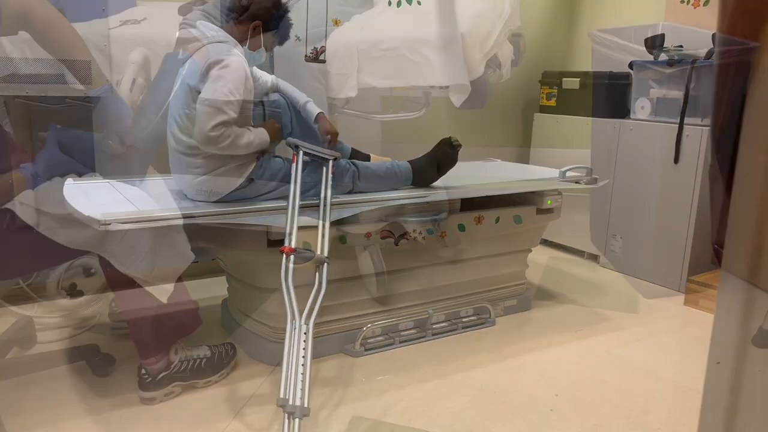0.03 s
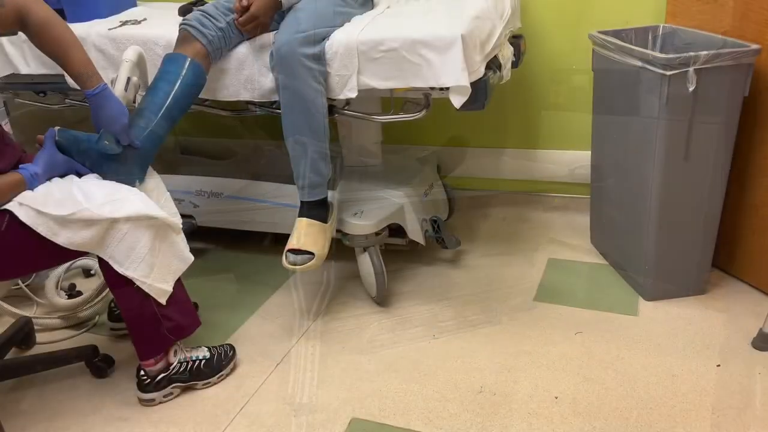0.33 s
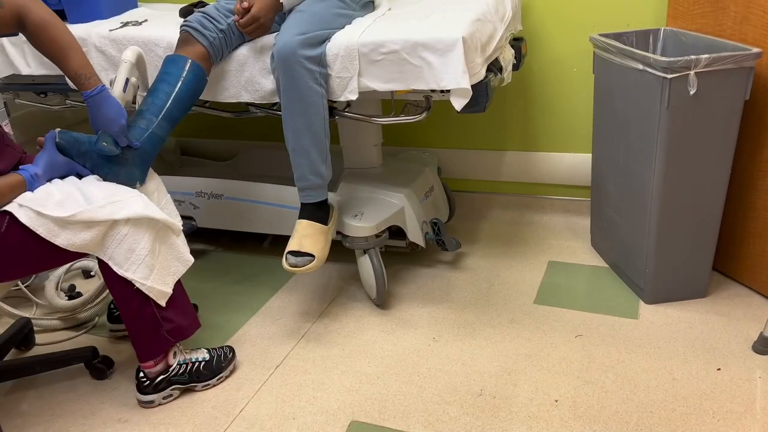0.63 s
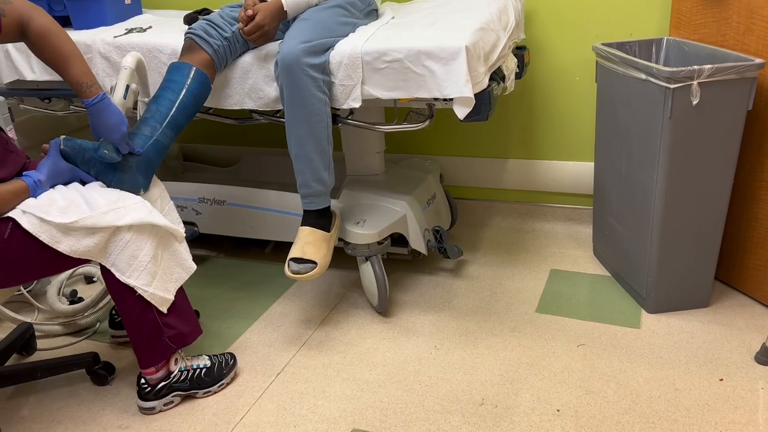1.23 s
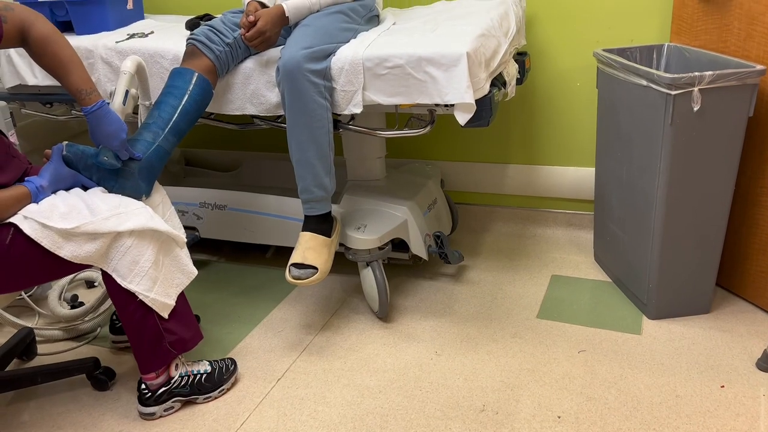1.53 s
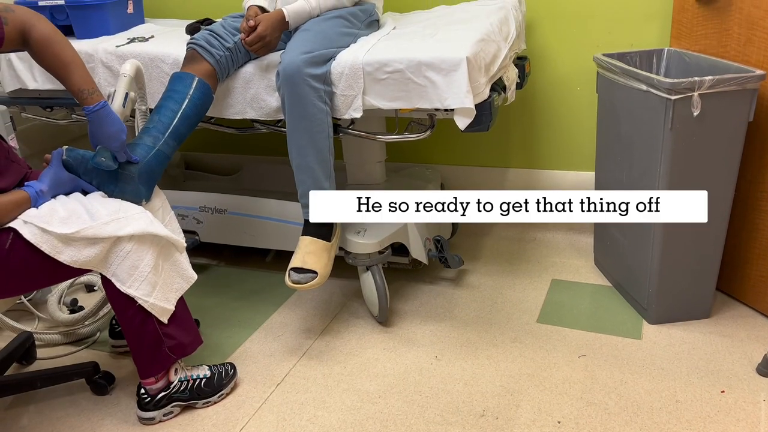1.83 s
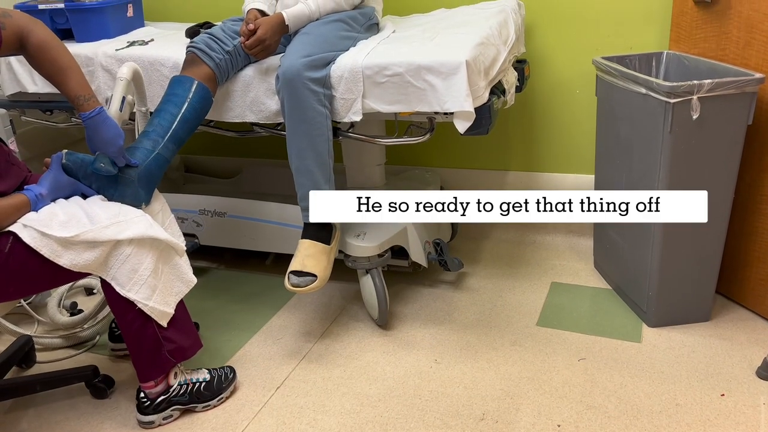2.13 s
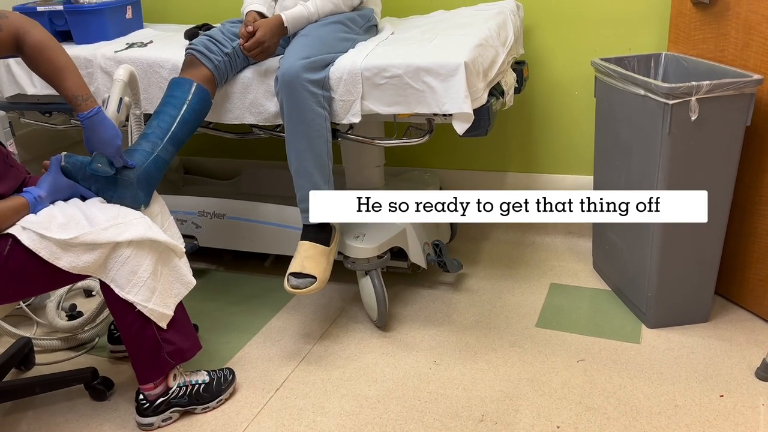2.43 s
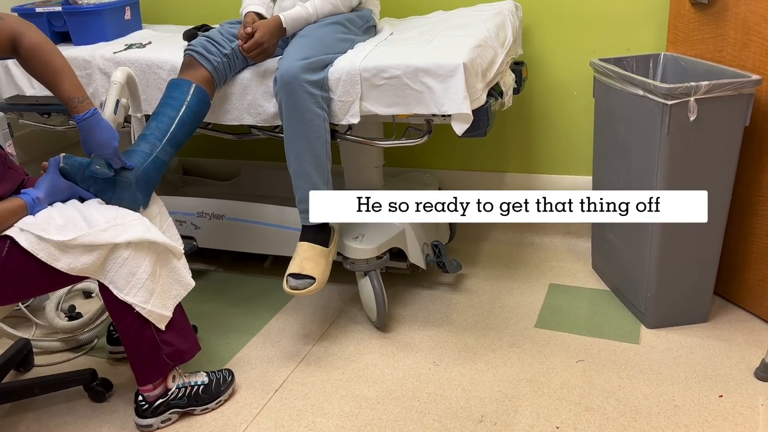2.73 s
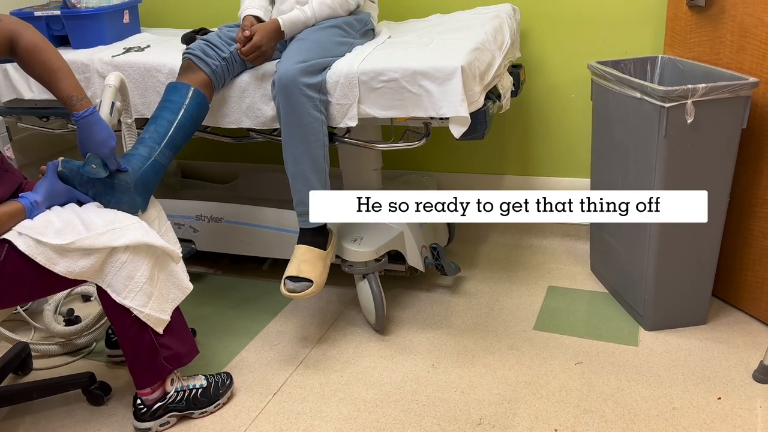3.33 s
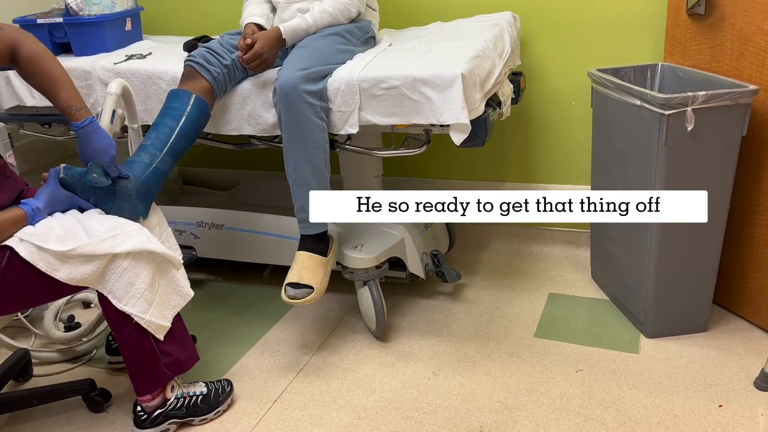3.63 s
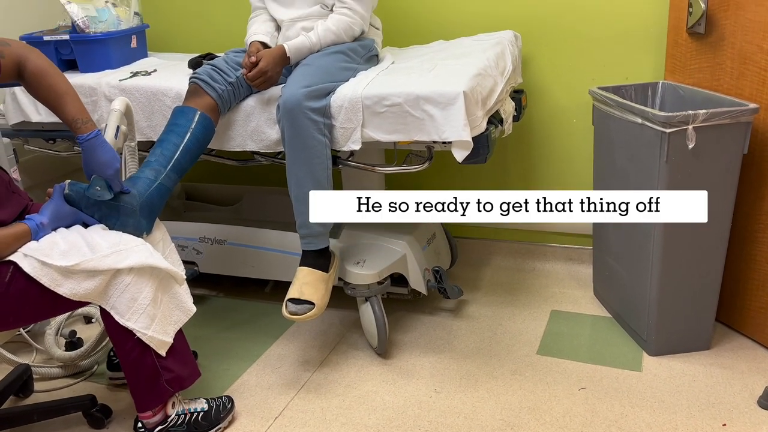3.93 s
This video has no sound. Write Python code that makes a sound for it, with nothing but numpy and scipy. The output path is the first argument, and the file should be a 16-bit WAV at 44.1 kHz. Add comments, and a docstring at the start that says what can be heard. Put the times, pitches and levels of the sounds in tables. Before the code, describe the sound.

A cast saw cuts into fibreglass with a continuous buzzing whine in a small room.

```python
"""A small, hard clinic room: a few steps away, an oscillating cast saw cuts a fibreglass leg cast.
The blade buzzes at its stroke rate; its teeth scrape and sizzle as it is pressed in.
Now and then they bite harder, or skate grittily over the glass fibres.
The dust extractor hums, whistles and hisses beside it. At first a low tone beats against both and fades."""
import sys
import numpy as np
from scipy import signal
from scipy.fft import rfft, irfft, next_fast_len
from scipy.io import wavfile
from scipy.ndimage import map_coordinates

SR = 44100
rng = np.random.default_rng(int(sys.argv[2]) if len(sys.argv) > 2 else 0)


def dump_mix(stems):
    """Bounce the given channels to the path in sys.argv[1] as a 16-bit WAV at rate SR."""
    frames = np.atleast_2d(stems).T  # one column per channel
    limited = np.clip(frames, -1, 1)  # hard clip at full scale
    pcm = np.round(limited * 32767).astype(np.int16)
    wavfile.write(sys.argv[1], SR, pcm)


N = 176400
TIME_S = np.arange(N) / SR


def amp(db):
    """dB to gain."""
    return 10 ** (np.asarray(db) / 20)


def unit(x):
    """Scale to rms 1."""
    return x / np.sqrt(np.mean(x ** 2) + 1e-20)


def along(points, hz):
    """Interpolate (f/Hz, value) on a log axis."""
    f, v = np.transpose(points)
    return np.interp(np.log(hz + 1), np.log(f + 1), v)


def curve(rows):
    """Interpolate (t/s, value) per sample."""
    return np.interp(TIME_S, *np.transpose(rows))


def swing(rows):
    """Curve minus its mean."""
    return curve(rows) - curve(rows).mean()


def wobble(rate_hz):
    """Smooth random curve, rate_hz knots a second."""
    return map_coordinates(rng.standard_normal(4096), [TIME_S * rate_hz + 2], mode="wrap")


def contacts(rows, edge_s):
    """Gain of (centre t/s, length/s, level/dB) contacts that catch, hold and let go."""
    return sum(amp(db) * .5 * (1 + np.tanh((length_s / 2 - abs(TIME_S - centre_s)) / edge_s))
               for centre_s, length_s, db in rows)


def filtered(x, response):
    """Apply the gain response(hz)."""
    size = next_fast_len(N + SR // 2)
    return irfft(rfft(x, size) * response(np.fft.rfftfreq(size, 1 / SR)), size)[..., :N]


def tone(phase, lag_rad):
    """Stereo sine, rms 1, right side lagging."""
    sides_rad = np.array([[lag_rad], [-lag_rad]]) / 2
    return np.sqrt(2) * np.sin(phase + rng.uniform(0, 2 * np.pi) + sides_rad)


# f/Hz, left-right correlation (clipped to +-1)
NOISE_CORRELATION = [(60, 0.94), (290, 0.89), (640, -0.32), (1400, -0.12), (3000, -0.24), (8000, 0.31),
                     (14000, -2.49)]


def stereo_noise(spectrum):
    """Shaped noise, rms 1: sides alike in the bass, diffuse above, opposed at the very top."""
    def mid_side_gains(hz):
        angle = np.arccos(np.clip(along(NOISE_CORRELATION, hz), -1, 1)) / 2
        return amp(along(spectrum, hz)) * [np.cos(angle), np.sin(angle)]
    mid, side = filtered(rng.standard_normal((2, N)), mid_side_gains)
    return unit(np.array([mid + side, mid - side]))


# Room decay: f/Hz, T60/s
ROOM_T60 = [(200, 0.49), (2000, 1), (10000, 0.06)]


def room(x):
    """Diffuse reflections off the hard walls, one tail per side."""
    hz, t, noise = signal.stft(rng.standard_normal((2, SR // 2)), SR, nperseg=256)
    decay = amp(-60 * t / along(ROOM_T60, hz)[:, None])
    tail = signal.istft(noise * decay, SR, nperseg=256)[1]
    return signal.fftconvolve(x, tail / np.linalg.norm(tail[0]), axes=1)[:, :N]


# Stroke rate: t/s, f/Hz
STROKE_HZ = [(0.06, 242.0), (0.14, 244.2), (0.26, 239.6), (0.4, 242.1), (0.52, 236.7), (0.6, 236.4),
             (0.7, 240.6), (0.88, 238.8), (0.98, 241.3), (1.3, 243.4), (1.46, 246.4), (1.76, 247.3),
             (2.02, 255.9), (2.1, 252.1), (2.18, 244.8), (2.3, 248.4), (2.48, 249.9), (2.64, 247.5),
             (2.74, 242.3), (2.94, 249.6), (3.3, 245.2), (3.4, 247.2), (3.68, 242.5), (3.93, 250.2)]
# How hard the blade rubs the cast: t/s, level/dB
RASP_DB = [(0.0, 2.5), (0.2, 2.5), (0.32, 2), (0.4, 3), (0.56, 1.8), (0.74, 3), (0.94, 0.5), (1.02, 1.5),
           (1.08, -0.5), (1.16, 1.5), (1.26, 1), (1.56, 2), (1.62, 2.5), (1.74, -1), (1.94, -5), (2.1, 4),
           (2.28, -1), (2.8, 3.5), (2.85, -5), (3.2, 1.5), (3.32, -1), (3.46, 1.5), (3.63, 2), (3.7, 3.5),
           (3.79, -10.5), (3.99, 2)]


def blade_motion():
    """The blade oscillates against the cast: stroke rate, stroke phase, rasp about its mean."""
    stroke_hz = curve(STROKE_HZ)
    return stroke_hz, 2 * np.pi * np.cumsum(stroke_hz) / SR, swing(RASP_DB)


# Harmonics 1-8: level/dB, rasp slope/(dB/dB), stroke-rate slope/(dB/Hz), right lag/rad
LOW_HARMONICS = [(-39.5, 0.5, -.5, 0.87), (-46, 1, 0.4, -1.84), (-37.5, 0.52, 0.36, -1.7),
                 (-42.5, 3.9, 0.17, 2.0), (-37, 0, -0.38, 1), (-37, 1, 0.1, -2), (-39.5, 0.9, 0.06, -4),
                 (-39, -0.5, 0, 1.5)]
# Swells of harmonics 5, 6, 8: t/s, level/dB
SWELL_5_DB = [(0.0, -6), (0.21, 7.5), (0.28, -5), (0.36, 3), (0.44, 6.5), (0.5, -9), (0.72, 2.5),
              (0.82, -20), (0.96, -3), (0.99, 3.5), (1.24, -1.5), (1.29, 0), (1.33, 3), (1.41, -5),
              (1.6, -3.5), (1.65, 12.5), (1.71, 0), (1.88, 0), (2.1, 4), (2.27, -10), (2.35, -2), (2.52, 2),
              (2.59, -6), (2.68, 12.5), (2.73, -3), (2.77, 14.5), (2.805, 9), (2.835, -18), (2.87, -0.5),
              (3.11, -2.5), (3.19, 6.5), (3.32, -3), (3.42, 7.5), (3.56, 3), (3.62, -7), (3.69, 13),
              (3.745, -4), (3.8, 3.5), (3.99, -9)]
SWELL_6_DB = [(0.06, 6), (0.13, -6), (0.4, 0.5), (0.62, 1.5), (0.85, 4.5), (1.08, -5), (1.9, -1),
              (1.98, -1), (2.22, -10), (2.36, 9), (2.7, 0), (3.99, 0)]
SWELL_8_DB = [(0.0, -35), (0.2, 6), (0.29, -5), (0.47, 10.5), (0.58, -3), (0.72, 7), (0.88, -6),
              (1.02, 7.5), (1.14, 0), (1.22, 4), (1.33, 4), (1.45, -0.5), (1.64, 6.5), (1.68, -0.5),
              (1.9, -1), (2.08, 8.5), (2.19, -8), (2.33, 6.5), (2.55, 13), (2.62, -2), (2.69, 9),
              (2.74, -9), (2.775, 19.5), (2.82, -15), (3.01, 12), (3.12, -2), (3.22, 9.5), (3.3, -7.5),
              (3.42, 8.5), (3.6, 8.5), (3.64, -21), (3.71, 9), (3.75, -12), (3.86, 0), (3.99, 5)]
# Envelope of harmonics 9-23: f/Hz, level/dB
UPPER_SPECTRUM = [(2200, -43), (2450, -47), (2720, -39.5), (3000, -46), (3200, -45.5), (3450, -46.5),
                  (3900, -49.5), (4450, -45.5), (5000, -51)]


def blade_buzz(stroke_hz, stroke_rad, rasp_db, bite_gain):
    """Stroke harmonics: the lowest stay clean, higher ones chatter and break up in the bites."""
    jitter_rad, low_drift_db, upper_drift_db, drift_hz = .035, 2, 3, 14
    chatter_db, chatter_rad, chatter_hz = 2.8, .4, 55
    bite_ring_db, room_db = 4, -14
    phase = stroke_rad + jitter_rad * amp(rasp_db / 2) * wobble(rate_hz=90)
    offset_hz = stroke_hz - stroke_hz.mean()
    swells_db = {5: swing(SWELL_5_DB), 6: swing(SWELL_6_DB), 8: swing(SWELL_8_DB)}
    bite_depth = (bite_gain / bite_gain.max()) ** 2
    slip_rad = chatter_rad * (1 + 0.66 * bite_depth)

    def harmonic(k, db, lag_rad, chatter):
        gain = amp(db + chatter * chatter_db * wobble(chatter_hz))
        return gain * tone(k * phase + chatter * slip_rad * wobble(chatter_hz), lag_rad)

    partials = []
    for k, (base_db, per_rasp_db, per_hz, lag_rad) in enumerate(LOW_HARMONICS, 1):
        drift_db = swells_db[k] if k in swells_db else low_drift_db * wobble(drift_hz)
        db = base_db + per_rasp_db * rasp_db + per_hz * offset_hz + drift_db
        partials.append(harmonic(k, db, lag_rad, chatter=(k - 1) / 10))
    for k in range(9, 24):
        drift_db = 0.36 * swells_db[8] + upper_drift_db * wobble(drift_hz)
        db = along(UPPER_SPECTRUM, k * stroke_hz.mean()) + drift_db + bite_ring_db * bite_depth
        partials.append(harmonic(k, db, rng.uniform(-np.pi, np.pi), chatter=1))
    return sum(partials) + amp(room_db) * room(sum(partials[1:]))


def tooth_pulse(stroke_rad, depth=0.33):
    """Gain, rms 1: the teeth rub in both directions of each stroke."""
    return unit(1 + depth * (np.cos(stroke_rad) + .5 * np.cos(2 * stroke_rad)))


# Teeth on the cast: f/Hz, density/dB
SCRAPE_SPECTRUM = [(200, -36), (380, -3), (600, -32), (800, 0), (1000, 0.5), (1750, -5.5), (2800, 2),
                   (4500, -10.5), (7000, -7.5), (15000, -20.5)]


def tooth_scrape(stroke_rad, rasp_db, bite_gain):
    """Friction noise, pulsed by the stroke, loudest in the bites."""
    gain = np.hypot(amp(-32.5 + rasp_db), bite_gain)
    return gain * tooth_pulse(stroke_rad) * stereo_noise(SCRAPE_SPECTRUM)


# Treble of the cut: f/Hz, density/dB
SIZZLE_SPECTRUM = [(4000, -33), (8000, -10), (10500, -6), (12800, 0), (15500, 0)]


def tooth_sizzle(rasp_db, bite_gain, flutter_db=1.1, width=.42):
    """Fluttering hiss of the teeth, near centre, rising in the bites."""
    gain = np.hypot(amp(-38 + .17 * rasp_db), amp(-11) * bite_gain)
    mid, side = filtered(rng.standard_normal((2, N)), lambda hz: amp(along(SIZZLE_SPECTRUM, hz)))
    hiss = unit(np.array([mid + width * side, mid - width * side]))
    return gain * amp(flutter_db * wobble(rate_hz=150)) * hiss


# Shaft hum: f/Hz, level/dB, right lag/rad
SHAFT_TONES = [(314.2, -31, -.33), (628.5, -60.5, 0)]
# Fan whistles: f/Hz, initial level/dB, fade/(dB/s)
FAN_WHISTLES = [(6788, -51, 1.5), (6907, -48, 4.5), (7025, -54, 4)]
# Rushing air: f/Hz, density/dB
AIR_SPECTRUM = [(25, -42), (42, -27), (54, 0), (70, -16), (110, -14), (170, -7.5), (260, -4.5), (400, -4),
                (600, -5.5), (1000, 0.5), (1500, 2.5), (1770, -3), (2050, 3.5), (4000, 1), (6000, 1.5),
                (7500, -6.5), (10000, -3), (15500, -84)]


def extractor(air_db=-29, sway_db=.6, wander_s=2e-5):
    """Constant-speed suction motor: shaft hum, thin fading fan whistles, rushing air."""
    t = TIME_S + wander_s * wobble(rate_hz=4.4)
    hum = sum(amp(db) * tone(2 * np.pi * hz * t, lag_rad) for hz, db, lag_rad in SHAFT_TONES)
    whistles = sum(amp(db - fade * t) * tone(2 * np.pi * hz * t, lag_rad=1)
                   for hz, db, fade in FAN_WHISTLES)
    air = amp(air_db + sway_db * wobble(rate_hz=7.03)) * stereo_noise(AIR_SPECTRUM)
    return hum + whistles + air


def opening_tone(hz=267.7, db=-38.5, fade_s=0.6):
    """A low tone beats against the saw and fades out."""
    fade = np.clip(1 - TIME_S / fade_s, 0, 1)
    return amp(db) * fade * tone(2 * np.pi * hz * TIME_S, lag_rad=0)


# Bites: centre t/s, length/s, level/dB
BLADE_BITES = [(0.48, 0.074, -32), (1.638, 0.07, -25), (2.13, 0.08, -48), (2.675, 0.04, -39),
               (2.782, 0.093, -30), (3.708, 0.068, -26.5)]


def blade_bites():
    """Bite gain: the teeth catch and let go abruptly."""
    return contacts(BLADE_BITES, edge_s=0.0036)


# Skates: centre t/s, length/s, level/dB
TOOTH_SKATES = [(1.2, 0.68, -39), (3.12, 0.27, -34)]
# Tooth tips on glass: f/Hz, density/dB
GRIT_SPECTRUM = [(2500, -25), (4400, -7), (6200, 0), (8500, -17)]


def tooth_skate(stroke_rad, grain_db=3):
    """Tooth tips skate over the glass fibres: grainy noise, pulsed by the stroke."""
    grain = amp(grain_db * wobble(rate_hz=300))
    grit = unit(tooth_pulse(stroke_rad) * grain * stereo_noise(GRIT_SPECTRUM))
    return contacts(TOOTH_SKATES, edge_s=.06) * grit


def scene():
    """Saw, extractor and opening tone, in stereo."""
    stroke_hz, stroke_rad, rasp_db = blade_motion()
    bite_gain = blade_bites()
    return (blade_buzz(stroke_hz, stroke_rad, rasp_db, bite_gain)
            + tooth_scrape(stroke_rad, rasp_db, bite_gain) + tooth_sizzle(rasp_db, bite_gain)
            + extractor() + opening_tone() + tooth_skate(stroke_rad))


def record(dry):
    """Brick-wall low-pass."""
    cutoff_hz = 15800
    return filtered(dry, lambda hz: hz < cutoff_hz)


dry = scene()
out = record(dry)
dump_mix(out)
```